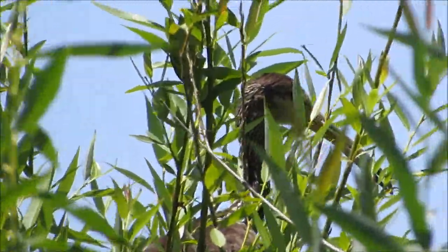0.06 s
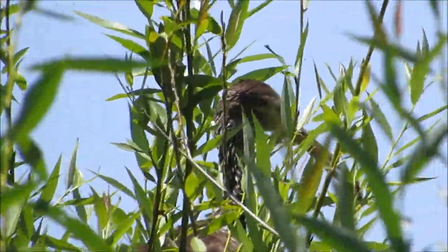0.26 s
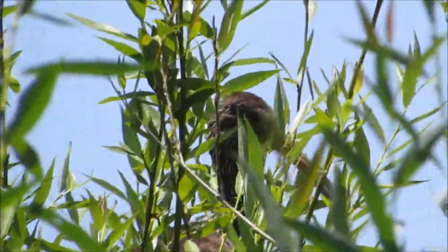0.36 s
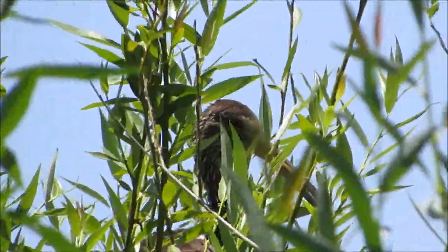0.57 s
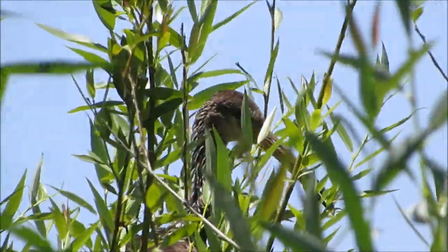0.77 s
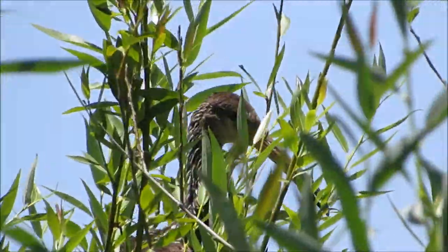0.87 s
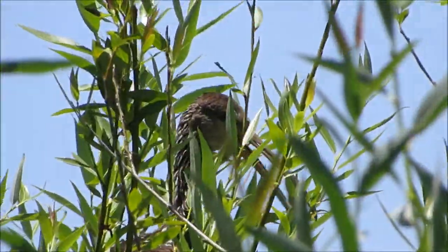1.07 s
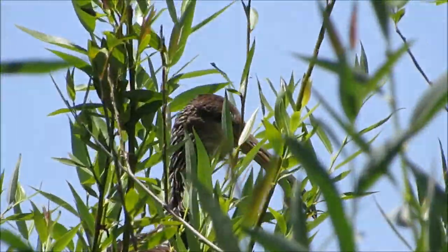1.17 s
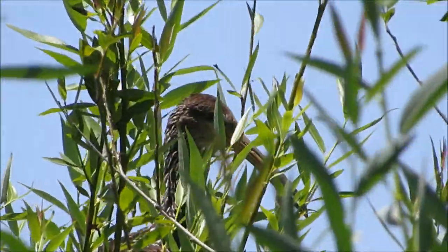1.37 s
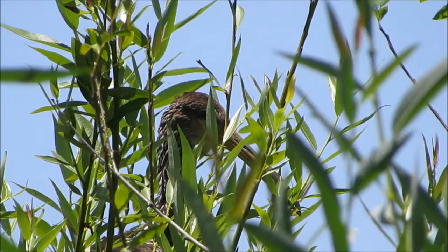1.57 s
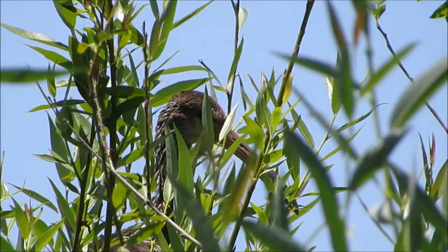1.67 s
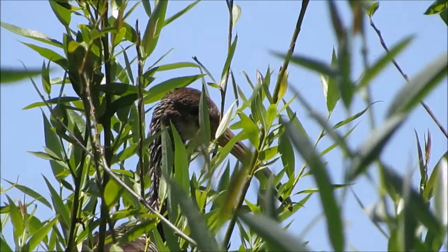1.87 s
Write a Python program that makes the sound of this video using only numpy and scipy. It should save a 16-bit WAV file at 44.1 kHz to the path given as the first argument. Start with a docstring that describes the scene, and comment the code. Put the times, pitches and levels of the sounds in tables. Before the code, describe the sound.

A large bird in a tree gives two short, harsh calls about a second apart, each a raspy falling note ending in a quick rattle. They echo lightly through the leaves over faint insects, low wind and distant outdoor noise.

```python
"""In a willow, a limpkin gives two short, harsh calls. Each opens on a rasping catch of the voice,
lands on a loud falling note that breaks up, and ends in a brief rattle of pulses ringing the throat.
Leaves and trees scatter the calls. Behind them sits a bed of distant outdoor wash, a thin band of
insects, a low rumble of wind and a faint hum, all shaped from noise."""
import sys
import numpy as np
from scipy import signal
from scipy.fft import rfft, irfft
from scipy.io import wavfile

SR = 44100
rng = np.random.default_rng(int(sys.argv[2]) if len(sys.argv) > 2 else 0)


def store_pcm(level_fs):
    """Save levels as 16-bit WAV."""
    pcm = np.round(np.clip(level_fs, -1, 1) * 32767).astype(np.int16)
    wavfile.write(sys.argv[1], SR, np.atleast_2d(pcm).T)


N = 83790

# The two calls. Each row: start in seconds, trim on the note's fundamental in dB, top pitch in Hz,
# note delay, note length and rattle delay in seconds, rattle trim in dB, rattle pulses per second.
CALLS = [(0.2395, 0, 1400, .0264, .0365, .069, -1, 205), (1.1345, -1.9, 1375, .0277, .033, .0675, 0, 215)]
CALL_TREBLE_DB = [-1, 0.5]  # a high shelf for each call
# The tone of throat and bill. Each row: frequency in Hz, gain in dB.
THROAT_EQ = [(300, -32), (600, -13), (850, -1), (1100, -16), (1500, 11.5), (1950, -1.5), (2400, 2.5),
             (2680, -1), (3080, -6.5), (3350, -4.5), (3550, -6), (3780, 0.5), (3930, -14.5), (4080, 3),
             (4300, -6), (4600, -5.5), (4880, -4), (5300, -16), (5900, -2.5), (6250, -8), (6650, -13.5),
             (7800, -13), (9200, -13.5), (11500, -27), (15000, -45)]
# The note's overtones, from the second harmonic up. Each entry: level in dB ahead of the throat EQ.
NOTE_OVERTONES_DB = [-36.5, -35.5, -46, -34.5, -58, -45, -46]
# The tone of the reflections off leaves, trees and far surroundings. Each row: frequency in Hz, gain in dB.
LEAVES_EQ = [(500, -15), (900, -22), (1250, -23), (1450, 11.5), (2000, -8), (2600, 8.5), (5000, 0),
             (14000, 8)]
TREES_EQ = [(500, 16), (850, -2), (1100, 5.5), (1350, -4.5), (2000, 3), (2600, 4.5), (4000, -3), (5000, 3),
            (7000, 6), (14000, 4)]
FAR_EQ = [(500, 20.5), (1000, -6), (1350, -17), (2600, -1), (6000, -7), (14000, -37)]
# The tone of the outdoor wash. Each row: frequency in Hz, relative level in dB.
WASH_EQ = [(100, -5.5), (190, -7.5), (260, -3.5), (380, -3.5), (470, -1), (600, -1.5), (800, -2.5),
           (1100, -10), (1700, -7), (2400, -16), (3200, -17.5), (4000, -24), (6000, -21.5), (9000, -26),
           (11000, -25), (13000, -35), (14200, -38), (15000, -55)]
# The stereo image of the wash. Each row: frequency in Hz, left-right correlation.
WASH_CORRELATION = [(100, 0.8), (200, -0.17), (370, -0.51), (700, .1), (1260, 0.51), (2300, 0.25),
                    (4200, 0.099), (7800, -0.071), (14000, 0.25)]
# The fader ride on the midrange swell. Each row: time in seconds, level in dB.
SWELL_RIDE = [(0, -46.5), (.15, -41.5), (.4, -35.5), (.55, -42), (.75, -42), (.95, -46.5), (1.1, -48),
              (1.9, -48)]
# The insect voices. Each row: centre and width in Hz, level in dB, fade-in start in seconds.
INSECT_BANDS = [(7076, 204, -55, -1), (7640, 130, -69, -1), (8150, 130, -64.5, 1.28)]
# The tone of the wind rumble. Each row: frequency in Hz, relative level in dB.
WIND_EQ = [(20, -64), (40, -23), (55, -5.5), (75, 8), (100, -0.5), (140, -14.5), (250, -42)]
# The tones of the hum. Each row: centre and width in Hz, level in dB.
HUM_BANDS = [(129.5, 2.4, -62), (256, 3.2, -62.5), (466.7, 11.6, -53.5), (799.4, 10.8, -54.5)]


def limpkin(t):
    """The dry bird: catch, note and rattle layered into each call."""
    voice = 0
    for row, treble_db in zip(CALLS, CALL_TREBLE_DB):
        start, note_db, hz, note_delay, note_length, rattle_delay, rattle_db, pulse_rate = row
        age = t - start
        call = catch(age) + note(age - note_delay, hz, note_length, note_db)
        call += undb(rattle_db) * rattle(age - rattle_delay, pulse_rate)
        voice = voice + eq(call, [(1100, 0), (4000, treble_db)])
    return voice


def catch(t, length=.0165, top_hz=1360, sag_hz_per_s=6760, flutter_hz=112):
    """The voice catches: an unsteady, fluttering tone whose overtones grow and ring the throat."""
    pitch = (top_hz - sag_hz_per_s * np.clip(t, 0, length)) * (1 + .028 * wander(576))
    phase = 2 * np.pi * np.cumsum(pitch) / SR
    flutter = 1 + .45 * np.sin(2 * np.pi * flutter_hz * t)
    fundamental = undb(-27.3) * flutter * np.sqrt(2) * np.sin(phase)
    stack = sum(np.sin(k * phase) for k in range(2, 9))
    overtones = undb(-30.5) * unit_rms(eq(stack, THROAT_EQ)) * ramp(t, .0096)
    voice = fundamental + overtones + undb(-34.5) * rasp()
    return gate(t, length, attack=.0012, release=.004) * voice


def note(t, top_hz, length, trim_db):
    """A clean sagging note, rough as it starts; its overtones plunge through the throat as it breaks."""
    hold_s, fade_db_per_s, sag_hz_per_s = .013, 410, 4500
    break_s, tail_s, plunge_hz_per_s = .0064, .0076, 32000
    t = np.clip(t, 0, length + tail_s)
    pitch = (top_hz - sag_hz_per_s * t) * (1 + .005 * wander(570))
    level_db = -12.8 + trim_db - fade_db_per_s * np.maximum(t - hold_s, 0)
    fundamental = undb(level_db) * np.sqrt(2) * np.sin(2 * np.pi * np.cumsum(pitch) / SR)
    since_break = np.maximum(t - length + break_s, 0)
    plunge_phase = 2 * np.pi * np.cumsum(pitch - plunge_hz_per_s * since_break) / SR
    stack = sum(undb(db) * np.sqrt(2) * np.sin(k * plunge_phase)
                for k, db in enumerate(NOTE_OVERTONES_DB, start=2))
    overtones = eq(stack * gate(t, length + tail_s, attack=.009, release=2 * tail_s), THROAT_EQ)
    onset_grit = undb(-30) * np.exp(-(t / .006) ** 2)
    break_grit = undb(-31) * ramp(since_break, break_s / 2)
    grit = (onset_grit + undb(-40) + break_grit) * rasp()
    return gate(t, length, attack=.0045, release=.003) * (fundamental + grit) + overtones


def rattle(t, rate, pulses=6, high_hz=1215, low_hz=885, ring_s=.0013, fade_s=.018):
    """The voice drops into uneven, fading pulses that ring two throat resonances over a little rasp."""
    train = 0
    for k, (slip, accent, detune) in enumerate(rng.standard_normal((pulses, 3))):
        age = t - (k + .07 * slip) / rate
        phase_per_hz = 2 * np.pi * (1 + .043 * detune) * age
        resonances = np.cos(high_hz * phase_per_hz) + undb(-15) * np.cos(low_hz * phase_per_hz)
        gain = undb(-16.7 + .4 * accent) * np.exp(-k / rate / fade_s)
        train = train + gain * np.exp(-(age / ring_s) ** 2 / 2) * resonances
    # The rasp creeps in two pulse periods early.
    envelope = ramp(t + 2 / rate, 1 / rate) * np.exp(-np.maximum(t, 0) / .0073)
    throb = 1 + .5 * np.cos(2 * np.pi * rate * t)
    return train + undb(-31.5) * envelope * throb * rasp()


def rasp():
    """The grit in the voice: chaotic vibration coloured by throat and bill."""
    return unit_rms(eq(rng.standard_normal(N), THROAT_EQ))


def reflections(voice, curve, t60_s, predelay_s):
    """Sound scattered by the surroundings: a dense, fading tail, different left and right."""
    t = np.arange(N) / SR
    tail = rng.standard_normal((2, N)) * undb(-60 * t / t60_s) * ramp(t - predelay_s, predelay_s)
    tail /= np.sqrt(np.sum(tail ** 2) / 2)
    return signal.fftconvolve(eq(voice, curve)[None], tail, axes=1)[:, :N]


def wash(t):
    """A wide bed of distant outdoor noise whose midrange swells and fades."""
    noise = stereo_noise(curve_at_bins(WASH_CORRELATION))
    bed = unit_rms(eq(noise, WASH_EQ)) * undb(-43 + .2 * wander(3))
    swell_db = np.interp(t, *np.array(SWELL_RIDE).T)
    swell = band(stereo_noise(.62), hz=1028, width_hz=202) * undb(swell_db)
    return pan(bed, left_db=.8) + pan(swell, left_db=3)


def insects(t, flicker_db=1.5, fade_in_s=.33):
    """A thin, flickering chorus far away; a higher voice joins late."""
    chorus = 0
    for hz, width_hz, db, start in INSECT_BANDS:
        shrill = band(stereo_noise(.37), hz, width_hz)
        chorus = chorus + shrill * undb(db + flicker_db * wander(24)) * ramp(t - start, fade_in_s)
    return chorus


def wind():
    """A low rumble, almost mono."""
    return undb(-53) * unit_rms(eq(stereo_noise(.99), WIND_EQ))


def hum():
    """A few faint, wavering low tones far off."""
    return sum(undb(db) * band(stereo_noise(.13), hz, width_hz) for hz, width_hz, db in HUM_BANDS)


def undb(db):
    """Decibels to gain."""
    return 10 ** (np.asarray(db) / 20)


def unit_rms(x):
    """Normalise to rms 1."""
    return x / np.sqrt(np.mean(x ** 2))


def bin_hz():
    """The frequency of each spectrum bin."""
    return np.arange(N // 2 + 1) * SR / N


def curve_at_bins(curve):
    """Join (Hz, value) points along a log-frequency axis."""
    hz, values = np.array(curve, float).T
    return np.interp(np.log(bin_hz() + 1), np.log(hz), values)


def eq(x, curve):
    """Equalise with a curve of (Hz, dB) points."""
    return irfft(rfft(x) * undb(curve_at_bins(curve)), N)


def band(x, hz, width_hz):
    """A bell-shaped band-pass, normalised to rms 1."""
    bell = np.exp(-((bin_hz() - hz) / width_hz) ** 2 / 4)
    return unit_rms(irfft(rfft(x) * bell, N))


def wander(hz):
    """A smooth random modulator up to about this rate, rms 1."""
    return band(rng.standard_normal(N), 0, hz / 2)


def stereo_noise(correlation):
    """Mid-side white noise with this left-right correlation."""
    mid, side = rfft(rng.standard_normal((2, N)))
    sides = np.array([[1], [-1]]) * side
    return irfft(mid * np.sqrt(1 + correlation) + sides * np.sqrt(1 - correlation), N)


def pan(x, left_db):
    """Tip the balance so the left leads the right by this many dB."""
    return x * undb(np.array([[left_db], [-left_db]]) / 2)


def ramp(t, seconds):
    """A linear fade-in from time zero."""
    return np.clip(t / seconds, 0, 1)


def gate(t, length, attack, release):
    """An attack, hold, release envelope, timed in seconds."""
    return ramp(t, attack) * ramp(length - t, release)


def scene():
    """The mix: the bird a little to the left, three layers of reflections, and the background."""
    t = np.arange(N) / SR
    bird = limpkin(t)
    leaves = undb(-7) * reflections(bird, LEAVES_EQ, t60_s=.07, predelay_s=.0013)
    trees = undb(-8) * reflections(bird, TREES_EQ, t60_s=.29, predelay_s=.009)
    far = undb(-10) * reflections(bird, FAR_EQ, t60_s=.6, predelay_s=.04)
    return pan(bird, left_db=2.8) + leaves + trees + far + wash(t) + insects(t) + wind() + hum()


def record(dry, cutoff_hz=14500):
    """A steep high cut across the mix."""
    return signal.sosfilt(signal.ellip(8, .2, 70, cutoff_hz, fs=SR, output="sos"), dry)


dry = scene()
out = record(dry)
store_pcm(out)
```